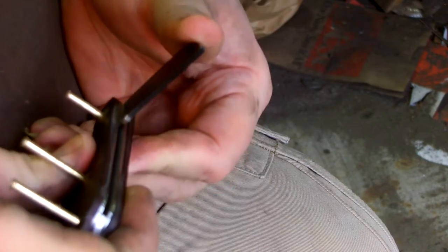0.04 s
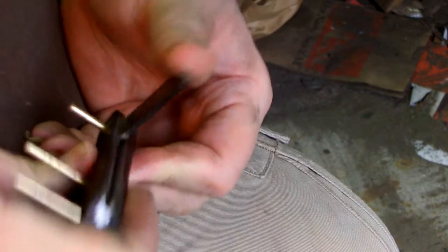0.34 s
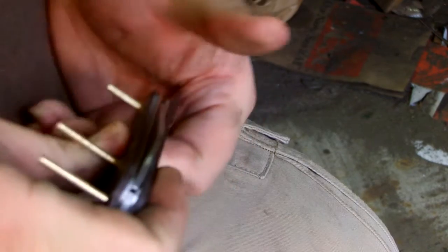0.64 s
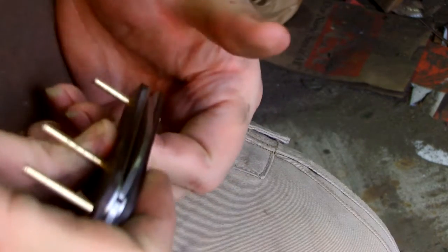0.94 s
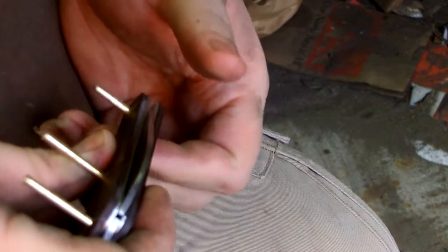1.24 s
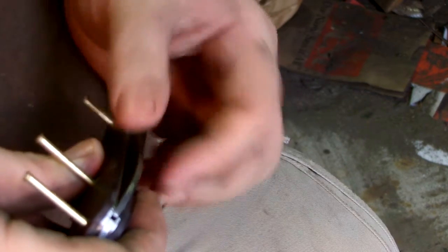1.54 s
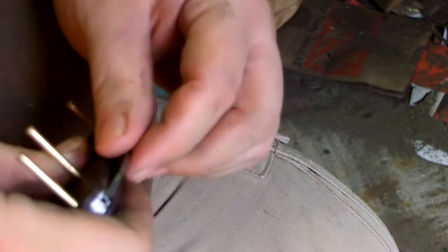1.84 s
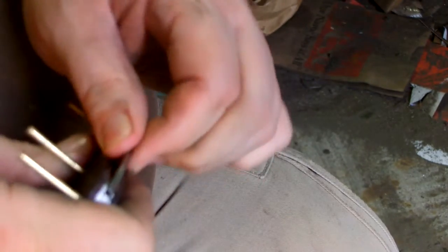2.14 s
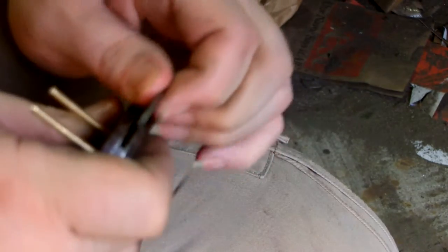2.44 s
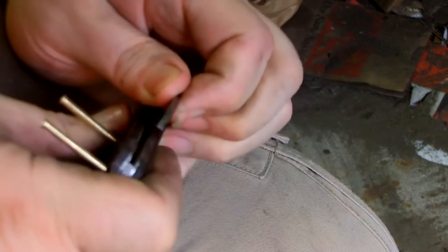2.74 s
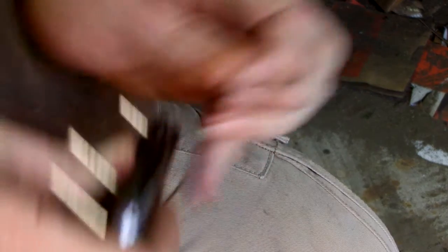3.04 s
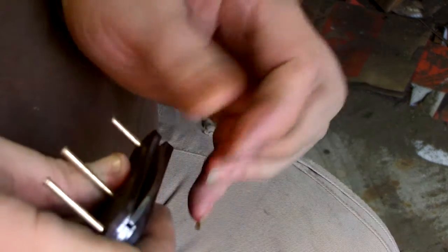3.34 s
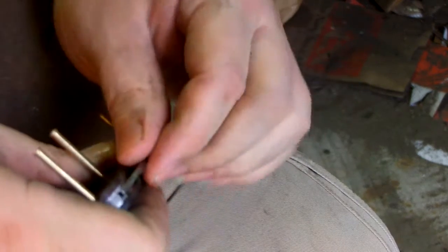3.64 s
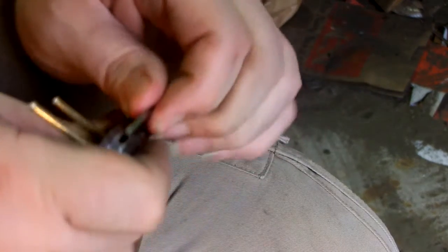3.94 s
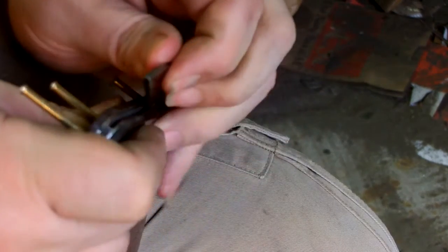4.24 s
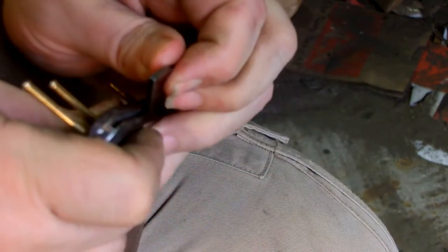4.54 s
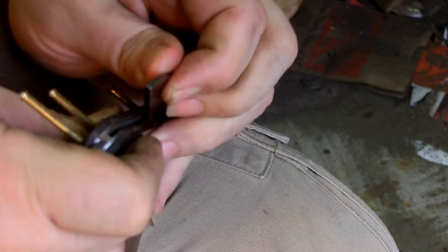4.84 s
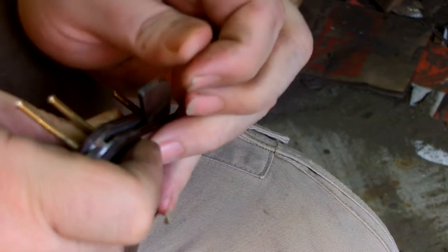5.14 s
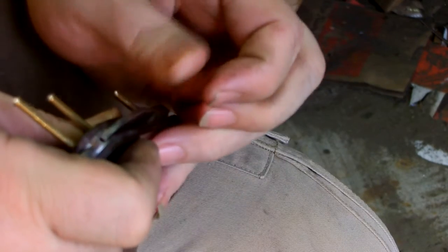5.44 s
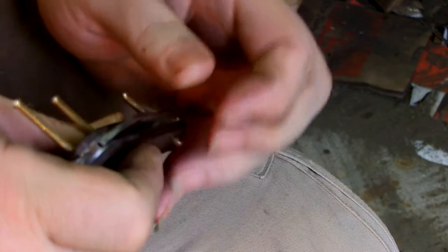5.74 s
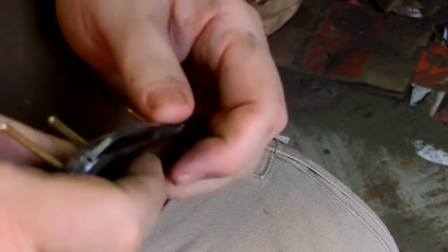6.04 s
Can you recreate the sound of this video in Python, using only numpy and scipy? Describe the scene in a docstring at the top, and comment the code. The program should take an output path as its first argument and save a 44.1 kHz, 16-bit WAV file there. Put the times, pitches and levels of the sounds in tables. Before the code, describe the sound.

Three crisp metallic clicks of pocketknife blades closing and opening by hand, spaced a few seconds apart over soft room noise.

```python
"""Folding pocketknife, close up

In a small, dry workshop two blades snap shut, then one snaps against its stop as it is opened.
Each snap is a slide of the tang on the back spring and a few steel contacts within milliseconds,
quickly damped by the hand. In between, the pivot rubs and the handle ticks in the fingers.
Behind it lie soft room noise, a brief hum and a far motor that runs up to speed."""
import sys
import numpy as np
from scipy import signal
from scipy.fft import rfft, irfft
from scipy.io import wavfile
from scipy.ndimage import uniform_filter1d

SR = 44100
rng = np.random.default_rng(int(sys.argv[2]) if len(sys.argv) > 2 else 0)


def wav_out(sig):
    """Save sig, one row per channel (or a flat mono array), as 16-bit PCM at SR to the path in sys.argv[1]."""
    wavfile.write(sys.argv[1], SR, np.round(np.clip(np.atleast_2d(sig).T, -1, 1) * 32767).astype(np.int16))


N = 268480
TIME_S = np.arange(N) / SR
FREQ_HZ = np.linspace(0, SR / 2, 8193)
LEFT_RIGHT = np.array([[1], [-1]])

# Blade snaps: (time [s], level [dB], knock into handle [dB], left minus right [dB], scatter [ms],
# first rebound lag [ms], rebound re blow [dB], slide length [s], slide re blow [dB], pose)
# Pose: 0 long blade shut, 1 short blade shut, 2 short blade open
BLADE_SNAPS = [(0.4381, 1.1, 2, -5, 0.69, 5.35, -6, .049, -45.5, 0),
               (3.0538, -1.5, -1.5, -1, 1.35, 4.1, -4.5, .008, -36.5, 1),
               (5.3798, 0.051, 0.1, -2.5, 1.1, 4.4, -7, .010, -40.5, 2)]


def undb(db):
    """Decibels to gain."""
    return 10 ** (np.asarray(db) / 20)


def unit(x):
    """Scale to rms 1."""
    return x / np.sqrt(np.mean(x ** 2))


def colour(points):
    """Gain over FREQ_HZ from (frequency [Hz], level [dB]) points."""
    hz, db = np.transpose(points)
    return undb(np.interp(np.log(FREQ_HZ + 1), np.log(hz + 1), db))


def shape(x, gain):
    """Minimum-phase filter: resonances ring after the blow."""
    cepstrum = irfft(np.log(gain + 1e-9))
    half = len(cepstrum) // 2
    cepstrum[1:half] *= 2
    cepstrum[half + 1:] = 0
    response = irfft(np.exp(rfft(cepstrum)))[:half]
    return signal.oaconvolve(np.atleast_2d(x), response[None], axes=1)[:, :N]


def add(track, at_s, sound):
    """Mix a sound into the track."""
    i = int(at_s * SR)
    track[..., i:i + sound.shape[-1]] += sound[..., :N - i]


def walk(rate_hz):
    """Smooth random drift, rms 1."""
    hold = int(SR / rate_hz)
    steps = np.repeat(rng.standard_normal(N // hold + 1), hold)
    return unit(uniform_filter1d(uniform_filter1d(steps, hold), hold)[:N])


def crack(scatter_ms, patchy_db=2.5, size=1024, bands=28):
    """One contact: a dying burst of micro-impacts, coloured by the spot struck; unit energy."""
    fade = np.exp(-TIME_S[:size] * 1000 / scatter_ms)
    band_of_bin = np.linspace(0, bands - 1, size // 2 + 1)
    spot = undb(patchy_db * np.interp(band_of_bin, np.arange(bands), rng.standard_normal(bands)))
    burst = rng.standard_normal(size) * fade
    for _ in range(3):  # impose spectrum and decay in turn
        spectrum = rfft(burst)
        burst = irfft(spot * spectrum / np.abs(spectrum)) * np.sqrt(fade)
    return burst / np.linalg.norm(burst)


def grit(spread_db):
    """Friction: dense tiny slips of uneven size."""
    return unit(rng.standard_normal(N) * undb(spread_db * rng.exponential(size=N)))


def air(level_db=-63, drift_db=0.2):
    """Steady room noise, nearly alike on both sides in the bass, wider in the treble."""
    # Noise spectrum: (frequency [Hz], relative density [dB])
    noise_colour = [(20, -35), (40, -17.5), (65, -15.5), (110, -9.5), (220, -11.5), (400, -5), (570, -7.5),
                    (800, -6.5), (1630, -10.5), (2560, -16), (4500, -18.5), (7280, -22.5), (13100, -21),
                    (15000, -21.5)]
    # Stereo width: (frequency [Hz], side minus mid [dB])
    side_colour = [(60, -19.5), (110, -16), (200, -12), (380, -12.5), (700, -8.5), (1290, -9), (2380, -4),
                   (4400, -2.5), (8120, 1), (15000, -1)]
    mid, side = rng.standard_normal((2, N))
    bed = shape(mid + LEFT_RIGHT * shape(side, colour(side_colour)), colour(noise_colour))
    return unit(bed) * undb(level_db + drift_db * walk(rate_hz=3.28))


def hum(hz=96.5, level_db=-82.5, end_s=0.52, release_s=0.25):
    """Faint low hum that dies away before the motor starts."""
    fade = np.clip((end_s - TIME_S) / release_s, 0, 1)
    return np.sqrt(2) * np.sin(2 * np.pi * hz * TIME_S) * undb(level_db) * fade


def motor(on_s=0.6, fade_s=0.4, start_hz=47, top_hz=89.7, spin_up_s=0.72):
    """A far motor runs up: two low tones, faint whines and a rush of air come through the walls."""
    # Low tones: (time [s], level at turning rate [dB], level at twice the rate [dB])
    low_tones = [(.6, -94, -77), (1.2, -81, -81), (1.55, -86, -76), (2, -89, -77.5), (2.6, -83.5, -82),
                 (3.5, -87, -78), (4.1, -77.5, -78.5), (5, -80, -75.5), (6.09, -80.5, -77.5)]
    # Whines: (multiple of turning rate, level at top speed [dB], loss below top speed [dB/Hz])
    whines = [(4.83, -79.5, 0.3), (6.83, -86.5, 0), (7.79, -82, 0.3)]
    # Rush of air: (frequency [Hz], relative level [dB])
    whirr_colour = [(150, -26.5), (250, -3), (310, -17), (360, -4.5), (440, 7.5), (540, -9.5), (900, -23)]
    waver, flutter_db, whirr_db = 0.009, 1, -75.5
    running_s = np.maximum(TIME_S - on_s, 0)
    deficit_hz = (top_hz - start_hz) * np.exp(-running_s / spin_up_s)
    turning_hz = top_hz - deficit_hz
    phase = 2 * np.pi * np.cumsum(turning_hz * (1 + waver * walk(rate_hz=9.8))) / SR
    times_s, *low_db = np.transpose(low_tones)
    partials = [(k, np.interp(TIME_S, times_s, db)) for k, db in enumerate(low_db, 1)]
    partials += [(k, db - loss * deficit_hz) for k, db, loss in whines]
    tones = sum(np.sqrt(2) * np.sin(k * phase) * undb(db + flutter_db * walk(rate_hz=4.1))
                for k, db in partials)
    whirr = unit(shape(rng.standard_normal(N), colour(whirr_colour)))
    whirr *= undb(whirr_db) * (turning_hz / top_hz) ** 2
    return (tones + whirr) * np.minimum(running_s / fade_s, 1)


def echoes(t60_s, build_s=0.0049, size=16384, smooth_bins=21):
    """Dense reflections that build up and die away; even spectrum, unit energy."""
    t = TIME_S[:size]
    envelope = (1 - np.exp(-(t / build_s) ** 2)) * np.exp(-np.log(1000) * t / t60_s)
    spectrum = rfft(rng.standard_normal(size) * envelope)
    even = irfft(spectrum / np.sqrt(uniform_filter1d(np.abs(spectrum) ** 2, smooth_bins)))
    even *= np.minimum(envelope * undb(40), 1)  # taper the quiet ends
    return even / np.linalg.norm(even)


def room(x, tail_t60_s=0.17, tail_db=-12, near_t60_s=0.044, near_db=-10, width=0.58):
    """Hands and lap scatter the sound at once; the small room follows with a short tail."""
    # Reflections: (frequency [Hz], gain [dB])
    room_colour = [(300, 5), (1000, 2), (2200, -0.5), (4000, 7), (6500, 3.5), (10000, -3.5), (15000, -5.5)]
    response = sum(undb(db) * (echoes(t60_s) + width * LEFT_RIGHT * echoes(t60_s))
                   for t60_s, db in ((tail_t60_s, tail_db), (near_t60_s, near_db)))
    reflected = signal.oaconvolve(x.mean(axis=0)[None], response, axes=1)[:, :N]
    return shape(reflected, colour(room_colour))


def rustle(peak_s=3.66, sigma_s=0.18, level_db=-66):
    """Soft, low rustle as the hand takes a new grip."""
    # Rustle spectrum: (frequency [Hz], relative level [dB])
    rustle_colour = [(120, -29.5), (250, -1.5), (330, 0.5), (450, 1.5), (600, -11.5), (1500, -21.5)]
    swell = np.exp(-((TIME_S - peak_s) / sigma_s) ** 2 / 2)
    return unit(shape(rng.standard_normal(N), colour(rustle_colour))) * undb(level_db) * swell


def handle(scatter_ms=2.1):
    """Dull ticks of the handle shifting in the fingers."""
    # Ticks: (time [s], level [dB])
    ticks = [(0.1588, -39.5), (.3605, -45), (4.9272, -38), (5.0362, -46), (5.127, -42), (5.595, -45),
             (5.7948, -51)]
    # Tick spectrum: (frequency [Hz], relative level [dB])
    tick_colour = [(500, -16.5), (1700, -15), (2300, 5), (2900, -10), (3500, -7.5), (4500, -18.5),
                   (12000, -27)]
    force = np.zeros(N)
    for at_s, db in ticks:
        add(force, at_s, undb(db) * crack(scatter_ms))
    return shape(force, unit(colour(tick_colour)))


def pivot():
    """Short, thin rubs as the blade begins to turn."""
    # Rubs: (start [s], length [s], level [dB])
    rubs = [(.76, .08, -74), (1.878, .012, -68), (2.38, 0.06, -65), (3.008, 0.085, -56),
            (3.927, 0.061, -61.5), (5.02, 0.073, -66)]
    # Friction spectrum: (frequency [Hz], relative level [dB])
    rub_colour = [(2000, -18), (7000, -27), (11500, -10), (13200, -1), (14500, -15), (16000, -27)]
    pressure = np.zeros(N)
    for start_s, length_s, db in rubs:
        add(pressure, start_s, undb(db) * np.sqrt(np.hanning(int(length_s * SR))))
    return pressure * unit(shape(grit(spread_db=3), colour(rub_colour)))


def tang_slide(pose, rise_db=10, rush_db=7, rush_s=0.0053):
    """The tang rasps on the spring, swelling, then rushing just before the blow: (slips, grind)."""
    # Rasp: (frequency [Hz], gain [dB])
    rasp_colour = [(1500, -5), (2700, -1), (3700, 4.5), (5000, -1), (8000, 0), (12000, 0), (15000, -5.5)]
    push = np.zeros(N)
    for at_s, db, *_, slide_s, slide_db, snap_pose in BLADE_SNAPS:
        if snap_pose == pose:
            to_go_s = at_s - TIME_S[(TIME_S >= at_s - slide_s) & (TIME_S < at_s)]
            swell_db = rush_db * np.exp(-to_go_s / rush_s) - rise_db * to_go_s / slide_s
            add(push, at_s - slide_s, undb(db + slide_db + swell_db))
    friction = np.array([grit(spread_db=-2), rng.standard_normal(N)])
    return push * shape(friction, colour(rasp_colour))


def contacts(rebounds=3, gap_ratio=0.5, loss_db=5.5, knock_db_per_db=1.28):
    """The tang slips off the spring; the blade grazes the liner, strikes, seats and rebounds."""
    # Light clicks of the blade leaving its rest; all returned rows share these columns:
    # (time [s], level [dB], knock [dB], left minus right [dB], scatter [ms], pose)
    clicks = [(2.3817, -34.5, -60, -2, 0.43, 2), (3.8758, -20, -21.5, -3, 0.075, 1)]
    # (lag [ms], level re strike [dB])
    slip, graze, strike, seat = (-7.2, -26), (-1.8, -10.5), (0, 0), (1.3, -9)
    rows = []
    for at_s, db, knock_db, pan_db, scatter_ms, rebound_ms, rebound_db, _, _, pose in BLADE_SNAPS:
        lags_ms = np.cumsum(rebound_ms * gap_ratio ** np.arange(rebounds))
        bounces = [(lag_ms, rebound_db - k * loss_db) for k, lag_ms in enumerate(lags_ms)]
        for lag_ms, force_db in [slip, graze, strike, seat] + bounces:
            handle_db = knock_db + knock_db_per_db * force_db
            rows.append((at_s + lag_ms / 1000, db + force_db, handle_db, pan_db, scatter_ms, pose))
    return rows + clicks


def knife(pose, width=0.39, slide_pan_db=-2, shudder_ms=2.5, grind_db=3, spread_exponent=0.61):
    """Slides and contacts ring blade, spring and liners: (direct sound, sound into the room)."""
    # Hand-held knife modes: (frequency [Hz], bandwidth [Hz], lift in pose 0, 1, 2 [dB])
    modes = [ (662, 230, -9.5, 4, -10), (1126, 73, 8, 8.5, 9.5), (1990, 205, 8, 9, 7),
             (2330, 160, 12, -6, 1), (2900, 300, -17, 4, 11.5), (3630, 130, 10, 7, 9),
             (4070, 114, -1, 14.5, 17), (4360, 150, 0, 8, -2), (5210, 390, -8, -2, 7),
             (6100, 61, 9, 12.5, -1), (6260, 54, 15, 8, 5), (7520, 257, 1, 2, 9.5), (8470, 240, 0, 0, 11.5),
             (9400, 380, 3.5, -1, 9), (10130, 80, 14, -4, 2), (10460, 200, 2, 1, 7),
             (10770, 300, 1, -8, 10), (12200, 220, 4, 1, 3), (13300, 140, 11, 10, 18),
             (13600, 400, 5.5, 5, 7), (13900, 160, 9, -8, 10), (14700, 300, -2, 6, 3)]
    # Steel contact: (frequency [Hz], gain [dB])
    steel_colour = [(100, -61), (600, -37.5), (1500, -17.5), (3000, -28.5), (5000, -18.5), (7000, -8.5),
                    (9000, -3.5), (12000, 2), (15000, -1)]
    # Liners and scales, which take up each blow and shudder longer: (frequency [Hz], gain [dB])
    liner_colour = [(100, -40), (350, -27.5), (650, -15.5), (1100, -15.5), (2000, -15.5), (3200, -14),
                    (4500, -11), (6500, -8.5), (9000, -14.5), (15000, -25)]
    blows, shudder = np.zeros((2, N)), np.zeros(N)
    for at_s, db, knock_db, pan_db, scatter_ms, contact_pose in contacts():
        if contact_pose == pose:
            # so near, each microphone port sees another face of the steel
            blow = crack(scatter_ms) + width * LEFT_RIGHT * crack(scatter_ms)
            add(blows, at_s, blow * undb(db + LEFT_RIGHT * pan_db / 2))
            add(shudder, at_s, crack(shudder_ms) * undb(knock_db))
    slips, grind = tang_slide(pose)
    steel = shape(blows + slips * undb(LEFT_RIGHT * slide_pan_db / 2), colour(steel_colour))
    liners = shape(shudder + grind * undb(grind_db), colour(liner_colour))
    struck = steel + liners
    # blade position decides which modes speak
    mode_power = sum(undb(lift_db[pose]) ** 2 / (1 + (2 * (FREQ_HZ - hz) / width_hz) ** 2)
                     for hz, width_hz, *lift_db in modes)
    resonance = np.sqrt(1 + mode_power)
    # summed over all directions, the modes stand out less
    return np.array([shape(struck, resonance), shape(struck, resonance ** spread_exponent)])


def scene():
    """The knife close up, its room and the background."""
    direct, spread = sum(knife(pose) for pose in range(3))
    handling = pivot() + handle()
    left, right = motor() + hum() + rustle() + air()
    background = np.array([np.roll(left, 2), right])  # from the right: left lags two samples
    return direct + handling + room(spread + handling) + background


def record(dry):
    """Steep elliptic low-pass."""
    cutoff_hz = 15250
    return signal.sosfilt(signal.ellip(10, 0.2, 70, cutoff_hz, fs=SR, output="sos"), dry)


dry = scene()
out = record(dry)
wav_out(out)
```